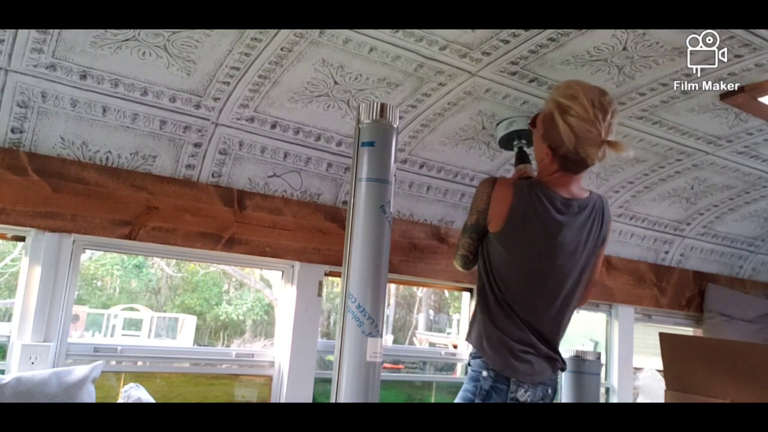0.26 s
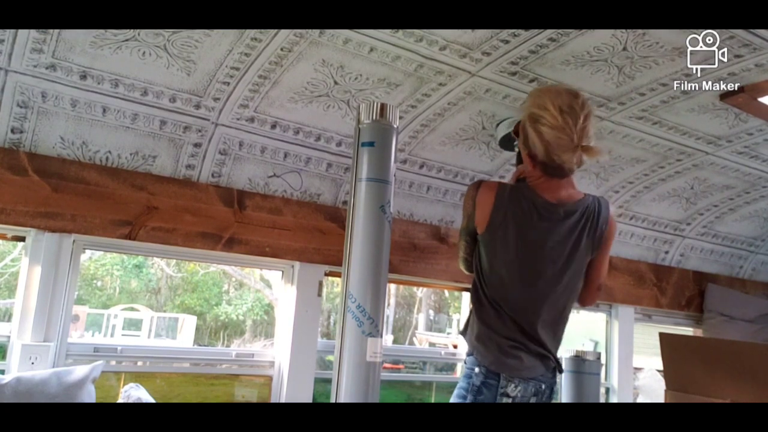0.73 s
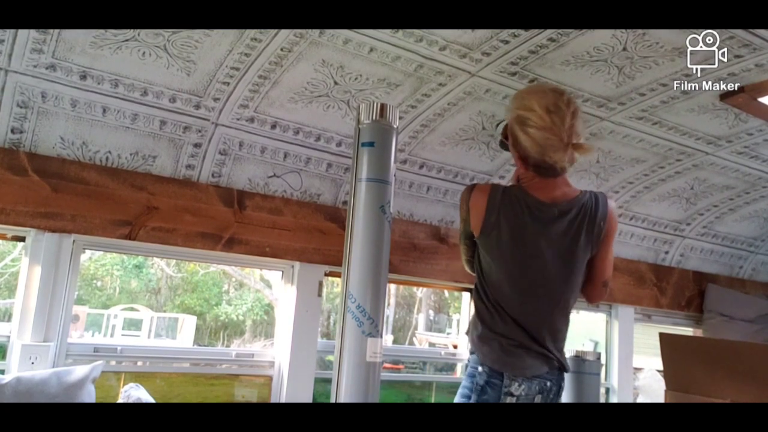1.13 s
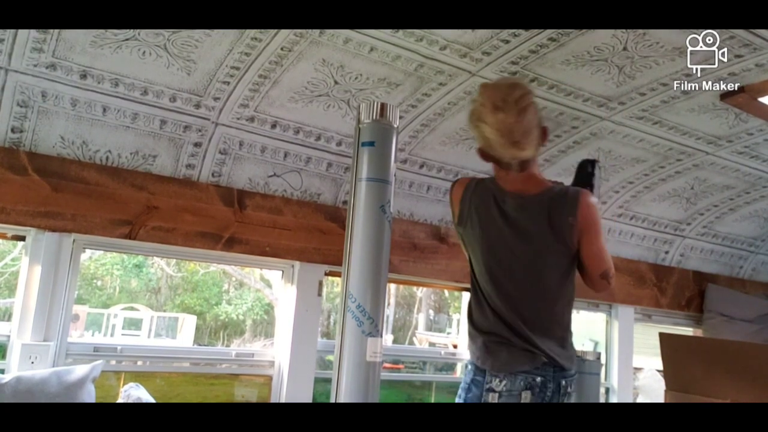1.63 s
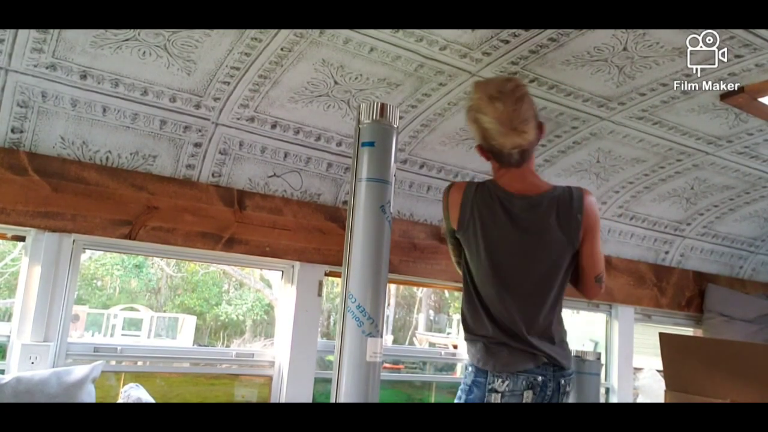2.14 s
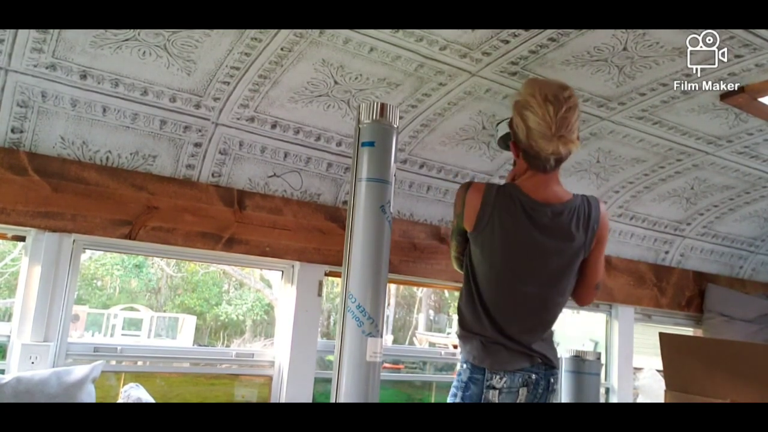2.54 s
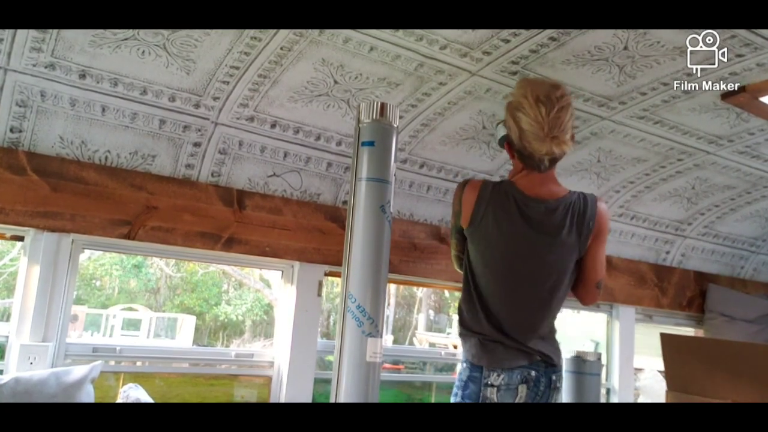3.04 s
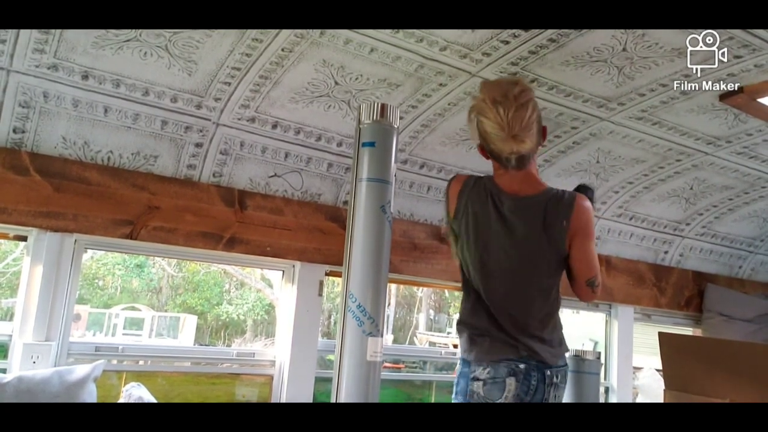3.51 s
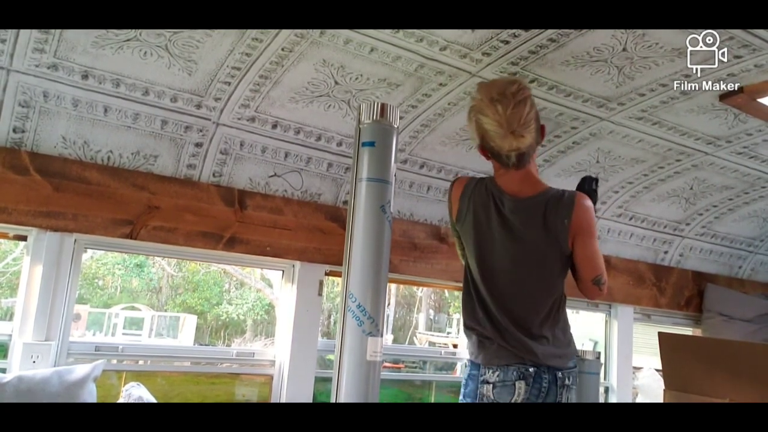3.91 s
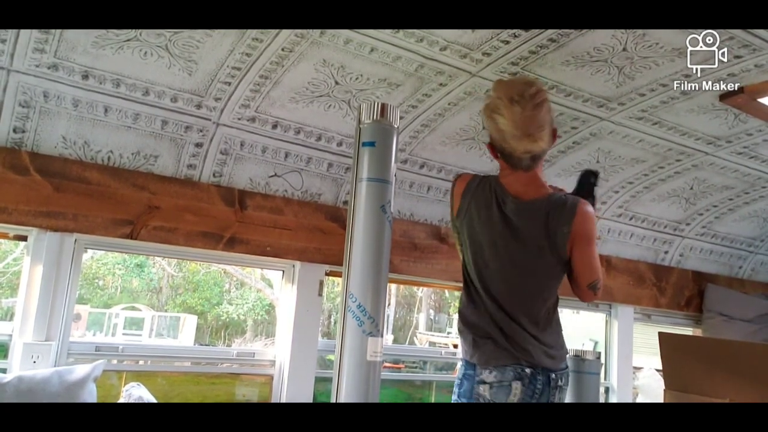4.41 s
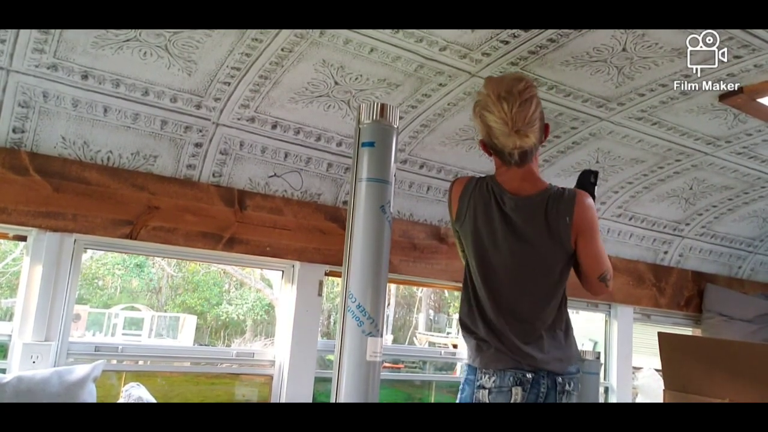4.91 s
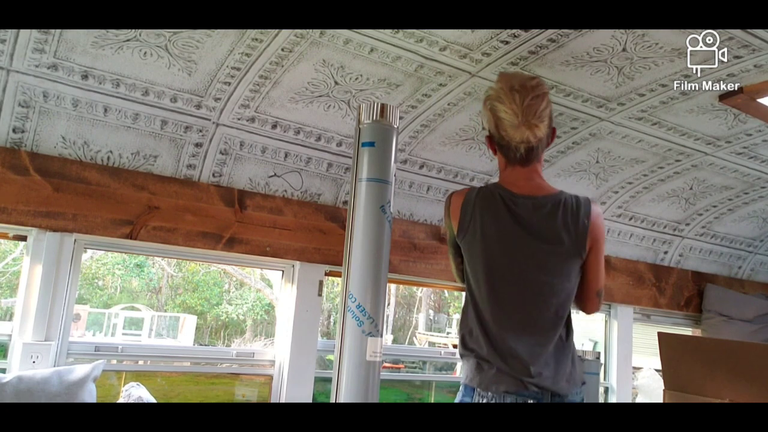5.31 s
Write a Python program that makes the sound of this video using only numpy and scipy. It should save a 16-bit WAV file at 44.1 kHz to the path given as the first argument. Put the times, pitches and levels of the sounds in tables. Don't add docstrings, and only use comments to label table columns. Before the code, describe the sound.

A cordless drill drives a hole saw into sheet metal, grinding and juddering in two loud runs with banging jolts and a brief lull between.

```python
import sys
import numpy as np
from scipy import signal
from scipy.io import wavfile
from scipy.ndimage import uniform_filter1d

SR = 44100
rng = np.random.default_rng(int(sys.argv[2]) if len(sys.argv) > 2 else 0)


def amplitude_ratio(level_db):
    exponent = np.asarray(level_db, float) / 20
    return 10 ** exponent


def to_wav(s):
    ch = np.atleast_2d(s).T
    pcm = np.round(np.clip(ch, -1, 1) * 32767)
    wavfile.write(sys.argv[1], SR, pcm.astype(np.int16))


N = 245146

# (full depth [s], rise [s], hold [s], fall [s], scrape level [dB])
FIRST_RUN_BITES = [(0.0, 0.14, 0.11, .05, -46.5), (0.042, 0.0018, 0.009, .05, -56),
                   (0.057, 0.0078, 0.087, 0.18, -33), (0.265, 0.041, 0.12, 0.15, -26.5),
                   (0.5333, 0.0013, 0.15, 0.16, -29.5), (0.81, 0.0047, 0.089, 0.14, -31.5),
                   (1.068, 0.046, 0.058, 0.15, -31), (1.265, 0.043, 0.026, 0.14, -31),
                   (1.441, 0.11, 0.0033, 0.14, -29), (1.61, .05, 0.011, 0.96, -58),
                   (1.891, 0.12, 0.017, 0.12, -50), (2.028, 0.091, .005, 0.042, -56.5),
                   (2.12, 0.034, 0.044, 0.16, -82), (2.26, .15, .08, .12, -72),
                   (0.526, 0.037, .005, .03, -34)]
# (full depth [s], rise [s], hold [s], fall [s], scrape level [dB])
SECOND_RUN_BITES = [(2.686, 0.0047, .02, 0.18, -63.5), (2.789, 0.0051, 0.039, 0.035, -38.5),
                    (3.172, 0.011, 0.0044, 0.042, -28), (2.841, 0.082, 0.2, 0.071, -33.5),
                    (3.068, .002, 0.069, 0.19, -33), (3.266, 0.034, 0.0029, 0.092, -34.5),
                    (3.393, 0.0038, 0.028, 0.13, -33.5), (3.45, 0.05, 0.0075, 0.12, -29.5),
                    (3.594, 0.034, 0.0091, 0.16, -28), (3.782, 0.035, 0.029, 0.25, -29),
                    (3.925, 0.0062, 0.034, 0.092, -25.5), (4.023, 0.066, 0.071, 0.22, -34.5),
                    (4.245, 0.14, 0.052, 0.096, -32.5), (4.409, 0.13, 0.033, 0.11, -31),
                    (4.554, 0.0063, 0.061, 0.088, -33), (4.735, 0.0049, 0.064, 0.1, -40.5),
                    (4.925, 0.035, 0.046, 0.14, -41.5), (5.131, 0.19, 0.0085, 0.095, -38),
                    (5.24, .02, 0.0077, 0.077, -54.5), (5.305, 0.0032, 0.008, 0.11, -50),
                    (5.36, 0.04, 0.08, .2, -69), (5.454, .003, 0.047, 0.15, -63)]
# (time [s], flex [dB])
ROOF_FLEX = [(0.0, 26), (0.1, 16), (0.3, 12), (0.45, 14), (0.7, 16), (0.92, 9), (1.12, 9), (1.3, 8),
             (1.55, 12.5), (1.72, 9.5), (2.82, 3), (3.05, 12), (3.3, 19), (3.5, 7.5), (3.97, 13.5),
             (4.3, 7.5), (4.7, 13.5), (5.3, 7)]
# (level over the bite [dB], share of flex [dB/dB], steepness of the fall [ratio],
# lag [s], loss per dB of lighter touch [dB/dB])
LAYER_FOLLOW = [
    (-1, 0.98, 0.8, 0.013, 0.5),
    (-1.5, 0.35, 1.12, 0, 0),
    (-2.5, -0.044, 1.78, 0.00071, 0.54),
    (0, 0.05, 1.29, 0.0011, 0.26),
]

# (frequency [Hz], level [dB per Hz])
BOOM_COLOUR = [(35, -29.5), (60, -10), (98, -2), (135, -0.5), (168, -6.5), (194, -5), (221, -11.5),
               (295, -5.5), (333, -10), (367, -12), (436, -20.5), (490, -18.5), (620, -39.5), (1060, -120)]
RASP_COLOUR = [(230, -32), (420, -18), (680, 1.5), (1100, 0.5), (1700, 0.5), (2200, -5), (3000, -11),
               (5000, -27), (12000, -75.5)]
FIZZ_COLOUR = [(5410, -23.5), (9200, -1.5), (10300, -0.5), (11900, 2.5), (14700, 1), (15900, -2.5)]
SCRAPE_COLOUR = [(900, -3), (1700, 1.5), (2500, -5.5), (3300, -4.5), (4200, -3.5), (5700, -6.5),
                 (7500, -13), (9600, -18), (14000, -36)]
# (frequency [Hz], width [Hz], level over the layer [dB])
SHEET_MODES = [(587, 18, -15.5), (670, 30, -9.5), (872, 25, -13), (1030, 49, -24), (1440, 26, -32.5),
               (2100, 60, -14)]
# (frequency [Hz], width [Hz], level over the layer [dB])
CUP_MODES = [(3020, 160, -39.5), (3520, 70, -30), (4260, 68, -23.5), (6360, 130, -27.5), (7070, 140, -22)]

# (time [s], panel level [dB], sheet level [dB], t60 [s])
TOOL_BUMPS = [(0.819, -18, -13, 0.053), (1.62, -82, -58, 2.8), (3.935, -40, -24, 0.17),
              (1.892, -21.5, -41.5, 0.2), (2.03, -43, -75, 0.17), (2.119, -54, -69, 0.24),
              (2.201, -47.5, -73, .6), (2.295, -34.5, -51.5, 0.31), (2.322, -39, -83, 0.2),
              (2.421, -39.5, -74.5, 0.27), (2.675, -41, -53.5, 0.73), (3.081, -21, -14.5, 0.18),
              (3.386, -10, -18, 0.038), (3.6, -44, -28.5, 0.29), (3.95, -41, -18.5, 0.13),
              (4.558, -38, -24, 0.12), (0.538, -33.5, -24, .15), (0.28, -37.5, -29.5, 0.29),
              (5.258, -43, -47, 0.26), (5.305, -38, -72, 0.23)]
# (time [s], level [dB], t60 [s])
SWARF_TRICKLES = [(0.049, -24.5, 0.04), (1.7, -69, 0.42), (2.065, -77, 0.09), (2.121, -69, 0.2),
                  (2.16, -75, 0.61), (2.705, -65.5, 0.4), (5.258, -61, .08), (5.444, -59, 0.027),
                  (5.47, -54, 0.15), (5.5, -70, 0.17)]
# (time [s], level [dB], t60 [s])
CUP_SCUFFS = [(1.62, -60, 0.73), (1.72, -60, 1.1), (1.79, -62, 0.62), (1.855, -46, 0.39), (1.95, -67, 0.18),
              (2.031, -50.5, 0.12), (2.125, -61, 0.11), (2.17, -74.5, .5), (5.459, -72, 0.26)]

# (time [s], blow level [dB])
TOOTH_JAMS = [(0.0598, -36.5), (0.5383, -1), (0.819, 3.5), (0.826, -7.5), (0.84, -9), (1.8944, -39),
              (2.0337, -62), (2.0647, -47), (2.1234, -44), (2.783, -46), (3.084, -11), (3.091, -15.5),
              (3.184, -23.5), (3.2691, -8.5), (3.396, -19), (3.7785, -36), (3.928, -9), (3.946, -2),
              (3.95, -13.5), (4.404, -22), (4.561, -39), (4.7385, -30), (5.446, -73)]
# (time [s], level [dB], ring [Hz])
FIRST_RUN_KNOCKS = [(0.057, -8, 87), (0.08, -6, 123), (0.118, -5.5, 280.6), (0.131, -3, 122.3),
                    (0.179, -12.5, 115), (0.01, -33, 377), (0.204, -31, 296), (0.37, -14.5, 325),
                    (0.602, -6, 278), (0.83, -14.5, 390), (0.855, -11.5, 182), (0.876, -9, 209.5),
                    (1.077, -24.5, 315), (1.287, -13, 247), (1.338, -23, 291), (1.497, -14, 249),
                    (0.285, -14.5, 287), (0.32, -10, 342), (0.394, -6.5, 255), (0.538, -9.5, 192.6),
                    (0.557, -6, 236.5), (0.639, -6, 132), (0.683, -3, 298), (0.838, -2.5, 205.2),
                    (1.101, -4.5, 110.6), (1.13, -21, 111), (1.17, -16, 95.6), (0.215, -17, 105),
                    (1.274, -11.5, 107), (1.398, -6, 105), (1.44, -12.5, 286), (1.488, -15, 143.7),
                    (1.531, -15, 107.7), (1.888, -19, 126.5), (1.933, -16.5, 123.3), (2.303, -23.5, 159),
                    (2.323, -30, 213), (2.342, -36.5, 331.5)]
# (time [s], level [dB], ring [Hz])
SECOND_RUN_KNOCKS = [(2.704, -21.5, 110), (2.818, -22, 117), (2.85, -15, 110), (3.002, -20, 150),
                     (3.096, -4, 139.5), (3.18, -15, 92), (3.207, -7, 111), (3.267, -8, 112),
                     (3.298, -5, 130), (3.397, -7.5, 141.6), (3.553, -12.5, 88.4), (3.787, -13, 95),
                     (3.8, -12, 97), (3.922, -30, 260), (3.936, -16, 413), (3.9498, -0.5, 289),
                     (3.966, -9.5, 251), (3.967, -11, 132), (4.015, -12, 122.7), (4.021, -25, 291),
                     (3.102, -11, 281), (3.182, -16.5, 319), (3.272, -26, 276), (3.295, -15.5, 269),
                     (3.405, -22.5, 248), (3.655, -21, 347), (3.827, -27, 223), (4.238, -38, 300),
                     (4.41, -23, 317), (4.62, -19.5, 337), (4.759, -28, 293), (4.969, -33, 317),
                     (4.051, -24, 115), (4.268, -19, 130), (4.414, -7.5, 121), (4.559, -8.5, 136.2),
                     (4.604, -7, 88), (4.735, -12, 90.3), (4.86, -24.5, 337), (4.901, -27.5, 330),
                     (4.944, -22, 253), (5.083, -24, 100), (5.259, -36, 93), (5.326, -26.5, 100)]

# (time [s], level [dB], length [s])
CUP_SQUEALS = [(0.4249, -26, 0.03), (0.909, -25.5, 0.038), (1.125, -19, 0.02), (2.937, -30, 0.044),
               (5.258, -43.5, 0.028)]
# (main mode [Hz], side mode [Hz])
SQUEAL_PAIRS = [(15300, 15100), (14620, 14250), (15300, 15050), (14750, 14450), (12800, 13050)]
# (time [s], length [s], from [Hz], to [Hz], level [dB])
STEEL_WHISTLES = [(2.72, .05, 6300, 6100, -58), (2.9, .15, 2090, 2110, -41), (3.148, .028, 2100, 2100, -38),
                  (3.028, .03, 3000, 2950, -41), (3.085, .07, 3020, 2980, -45),
                  (4.215, .095, 3150, 3400, -46), (4.335, .055, 3350, 3420, -44),
                  (4.4, .02, 2110, 2110, -39), (4.4, .02, 1740, 1740, -39), (4.425, .035, 2060, 2030, -41),
                  (4.465, .055, 2980, 3120, -52), (5.1, .07, 7080, 7120, -57), (5.19, .07, 2120, 2100, -63),
                  (5.36, .06, 2120, 2100, -73), (5.44, .09, 850, 1000, -70), (4.25, .07, 3480, 3560, -40),
                  (4.255, .035, 2080, 2060, -38), (4.445, .025, 3700, 3150, -43),
                  (4.865, .065, 5530, 5720, -58), (4.93, .085, 2110, 2040, -52), (5.0, .1, 6050, 6150, -51),
                  (5.11, .07, 2080, 2080, -52), (5.34, .11, 4620, 4620, -76), (5.455, .06, 4350, 4280, -73),
                  (4.085, .025, 3300, 3280, -39), (3.455, .025, 2110, 2110, -37),
                  (3.475, .02, 1760, 1750, -38), (3.61, .025, 2040, 2060, -37),
                  (3.605, .02, 1170, 1150, -37), (3.99, .03, 2100, 2110, -35)]
# (time [s], pitch [Hz], level [dB])
GEAR_WHINES = [
    [(2.808, 2700, -44), (2.822, 3100, -36), (2.834, 3570, -40), (2.852, 3660, -38), (2.868, 3510, -31),
     (2.895, 3470, -36)],
    [(2.903, 4080, -33), (2.93, 4020, -39), (2.952, 4150, -36), (2.988, 4110, -39), (3.006, 3600, -35),
     (3.02, 3420, -34), (3.035, 3450, -43), (3.085, 3550, -43)],
]

# (frequency [Hz], t60 [s])
CABIN_DECAY = [(60, 0.72), (300, 0.33), (1000, 0.18), (4000, 0.16), (15000, 0.15)]
# (frequency [Hz], likeness [0-1])
CABIN_LIKENESS = [(60, 1), (150, 0.92), (300, 0.79), (650, 0.83), (1400, 0.034), (15000, 0.032)]
# (frequency [Hz], level [dB])
CABIN_COLOUR = [(60, -10.5), (200, -18), (500, 0), (1500, 6), (15000, 8)]
# (frequency [Hz], level [dB per Hz])
AIR_COLOUR = [(15, -32), (25, 12.5), (53, -1.5), (104, -9), (242, -34.5), (271, -32), (553, -56),
              (915, -53.5), (1600, -64), (1900, -48), (2250, -50), (2450, -67), (6000, -67.5), (7800, -100),
              (13200, -120)]
# (frequency [Hz], level [dB])
PORT_LEAN = [(300, 1.26), (700, -1.5), (1500, -1.5), (4400, -4), (8000, -0.5), (13000, -1)]
# (frequency [Hz], level [dB])
PORT_BAND = [(18, -30), (35, -5), (55, 0), (15870, 0), (15990, -60), (22000, -70)]


def saw():
    catches = chips(per_s=160, spread_db=5.0, smooth=0.61, count=2)
    judder = amplitude_ratio(1.93 * evened(resonate(rng.standard_normal(N), 40.0, 34.0)))
    grit = judder * chips(per_s=1500, spread_db=4.0, smooth=0.44, count=3)
    boom = ringing(catches[0], BOOM_COLOUR, [])
    rasp = ringing(grit[0] + 0.088 * catches[1], RASP_COLOUR, SHEET_MODES)
    fizz = ringing(grit[1], FIZZ_COLOUR, [])
    scrape = ringing(grit[2], SCRAPE_COLOUR, CUP_MODES)
    cutting = sum(bites(*rule) * layer for rule, layer in zip(LAYER_FOLLOW, [boom, rasp, fizz, scrape]))
    panel_gain, sheet_gain = bumps()
    bumped = dulled(panel_gain * boom + sheet_gain * rasp, 2190, order=5)
    swarf = trickle(SWARF_TRICKLES) * fizz
    scuffed = dulled(trickle(CUP_SCUFFS) * scrape, 3700, order=2)
    return cutting + swarf + scuffed + bumped


def chips(per_s, spread_db, smooth, count):
    hit = rng.random(N) < per_s / SR
    size = evened(hit * amplitude_ratio(spread_db * np.minimum(rng.exponential(1, N), 4)))
    impacts = size * rng.choice([-1., 1.], (count, N))
    return (1 - smooth) * impacts + smooth * rng.standard_normal((count, N))


def ringing(drive, points, modes):
    broad = evened(colour(drive, points))
    flexing = 1 + 0.0085 * evened(resonate(rng.standard_normal(N), 0., 16.0))
    rung = sum(amplitude_ratio(db) * evened(resonate(broad, hz * flexing, width)) for hz, width, db in modes)
    return evened(broad + rung)


def bites(over_db, share, steep, lag_s, lost):
    sag_db_per_s = 13
    grab_db, grab_s, sudden_s = 3.5, 0.052, .006
    usual_bite_db = -35
    t = np.arange(0, N, 32) / SR
    s, rise, hold, fall, db = np.transpose(FIRST_RUN_BITES + SECOND_RUN_BITES)[:, :, None]
    u = t - s - lag_s
    edges_db = -20 * np.maximum(-u, 0) / rise - 20 * steep * np.maximum(u - hold, 0) / fall
    grabbed_db = (rise < sudden_s) * grab_db * np.exp(-abs(u) / grab_s)
    held_db = grabbed_db - sag_db_per_s * np.clip(u, 0, hold)
    touch_db = db + lost * np.minimum(db - usual_bite_db, 0)
    gain = np.linalg.norm(amplitude_ratio(touch_db + held_db + edges_db), axis=0)
    flex_db = share * np.interp(t, *np.transpose(ROOF_FLEX))
    return np.interp(np.arange(N) / SR, t, gain * amplitude_ratio(over_db + flex_db))


def bumps():
    rise_s = 0.0062
    gain, t = np.zeros((2, N)), np.arange(SR // 2) / SR
    for s, panel_db, sheet_db, t60 in TOOL_BUMPS:
        for layer, db in zip(gain, (panel_db, sheet_db)):
            add(layer, s, amplitude_ratio(db - 60 * t / t60) * np.minimum(t / rise_s, 1))
    return gain


def trickle(rows):
    rise_s = 0.0013
    gain, t = np.zeros(N), np.arange(SR // 2) / SR
    for s, db, t60 in rows:
        add(gain, s, amplitude_ratio(db - 60 * t / t60) * np.minimum(t / rise_s, 1))
    return gain


def jams():
    t60 = 0.01
    crack, t = np.zeros(N), np.arange(SR // 5) / SR
    for (s, db), noise in zip(TOOTH_JAMS, rng.standard_normal((len(TOOTH_JAMS), len(t)))):
        add(crack, s, amplitude_ratio(db - 3.0 - 60 * t / t60) * noise)
    return colour(crack, [(200, -1.5), (1000, -4.0), (4000, 1.5), (8000, -7.5), (12000, 2.0), (16000, -7.5)])


def snaps():
    snap_db, t60 = -7.5, 0.0079
    out, t = np.zeros(N), np.arange(SR // 50) / SR
    for (s, db), noise in zip(TOOTH_JAMS, rng.standard_normal((len(TOOTH_JAMS), len(t)))):
        add(out, s, amplitude_ratio(db + snap_db - 60 * t / t60) * noise)
    return colour(out, [(200, -4.5), (1000, 9.5), (4000, -4), (8000, -4), (12000, -1.5), (16000, -8)])


def knocks():
    thud, t = np.zeros(N), np.arange(SR // 5) / SR
    for s, db, hz in FIRST_RUN_KNOCKS + SECOND_RUN_KNOCKS:
        overtone = 0.31 * np.sin(2 * np.pi * 2.5 * hz * t) * amplitude_ratio(-60 * t / 0.17)
        ring = np.sin(2 * np.pi * hz * t) + overtone
        t60 = 0.18 * (150 / hz) ** .4
        onset = np.sin(np.pi / 2 * np.minimum(t * hz / 0.84, 1)) ** 2
        add(thud, s, amplitude_ratio(db - 3.0 - 60 * t / t60) * onset * ring)
    return thud


def squeals():
    out, t = np.zeros(N), np.arange(SR // 5) / SR
    noises = rng.standard_normal((len(CUP_SQUEALS), 2, len(t)))
    for (s, db, length), (hz, side_hz), noise in zip(CUP_SQUEALS, SQUEAL_PAIRS, noises):
        burst = np.minimum(t / .002, 1) * (.35 + amplitude_ratio(-700 * t))
        release = amplitude_ratio(-700 * np.maximum(t - length, 0))
        pair = wavering(hz, noise[0], waver_hz=89.3) + 0.8 * wavering(side_hz, noise[1], waver_hz=119.0)
        add(out, s, amplitude_ratio(db + 2.5) * burst * release * pair)
    return out


def whistles():
    edge_db = -3
    arches = [[(s, a, db + edge_db), (s + d / 2, (a + b) / 2, db), (s + d, b, db + edge_db)]
              for s, d, a, b, db in STEEL_WHISTLES]
    lines = GEAR_WHINES + arches
    out = np.zeros(N)
    for rows, noise in zip(lines, rng.standard_normal((len(lines), SR // 3))):
        s, hz, db = np.transpose(rows)
        t = np.arange(s[0], s[-1], 1 / SR)
        line = wavering(np.interp(t, s, hz), noise[:len(t)], waver_hz=35.)
        add(out, s[0], amplitude_ratio(np.interp(t, s, db) + 7.0) * line * signal.windows.tukey(len(t), .3))
    return out


def wavering(hz, noise, waver_hz):
    tremble = evened(uniform_filter1d(noise, 130))
    flutter = amplitude_ratio(2.5 * evened(uniform_filter1d(noise[::-1], 220)))
    return np.sqrt(2) * flutter * np.sin(2 * np.pi * np.cumsum(hz + waver_hz * tremble) / SR)


def cabin(x, count=7):
    out = np.zeros((2, N))
    turn = 8.0 * count * np.arange(N) / SR
    for k in range(count):
        hz, t, z = signal.stft(rng.standard_normal((2, SR // 4)), SR, nperseg=512)
        same = np.clip(read(CABIN_LIKENESS, hz), 0, 1)[:, None]
        z = np.array([z[0], same * z[0] + np.sqrt(1 - same ** 2) * z[1]])
        decay = amplitude_ratio(-60 * t / read(CABIN_DECAY, hz)[:, None])
        tail = signal.istft(z * decay, SR, nperseg=512)[1]
        tail = tail * np.clip(np.arange(tail.shape[1]) / SR / 0.0027, 0, 1)
        tail = tail / np.linalg.norm(tail[0])
        facing = np.sin(np.pi / 2 * np.minimum((turn - k) % count, 2))
        out = out + signal.oaconvolve((facing * x)[None], tail, axes=1)[:, :N]
    return colour(out, CABIN_COLOUR)


def still_air():
    shell_hz, shell_width_hz, shell_db, rumble_db = 2080, 350, -86, -47.5
    a, b, c, d = rng.standard_normal((4, N))
    shell = []
    for x in (c, d):
        once = resonate(x, shell_hz, shell_width_hz)
        shell.append(evened(resonate(once, shell_hz, shell_width_hz)))
    rumble = evened(colour(np.array([a + 0.065 * b, a - .12 * b]), AIR_COLOUR))
    return amplitude_ratio(rumble_db) * rumble + amplitude_ratio(shell_db) * np.array(shell)


def evened(x):
    return x / np.sqrt(np.mean(x ** 2) + 1e-20)


def read(points, hz):
    f, value = np.transpose(points)
    return np.interp(np.log(hz + 1), np.log(f + 1), value)


def add(mix, s, sound):
    part = mix[round(s * SR):][:len(sound)]
    part += sound[:len(part)]


def colour(x, points):
    if x.ndim > 1:
        return np.array([colour(c, points) for c in x])
    gain_db = np.maximum(read(points, abs(np.fft.fftfreq(8192, 1 / SR))), -100)
    log_gain = gain_db * np.log(10) / 20
    taps = np.fft.ifft(np.exp(np.conj(signal.hilbert(log_gain)))).real[:4096]
    return signal.oaconvolve(x, taps, axes=-1)[..., :N]


def resonate(x, hz, width):
    turn = np.exp(2j * np.pi * np.cumsum(hz * np.ones(len(x))) / SR)
    r = np.exp(-np.pi * width / SR)
    return 2 * (turn * signal.lfilter([1 - r], [1, -r], x / turn)).real


def dulled(x, hz, order):
    return signal.sosfilt(signal.butter(order, hz, fs=SR, output="sos"), x)


def later(x):
    lead = 18
    return np.pad(x, (lead, 0))[:N]


def scene():
    cut = saw() + jams() + knocks()
    whistle = squeals() + whistles()
    tool = cut + snaps() + whistle * amplitude_ratio(-2 / 2)
    bass = signal.lfilter(*signal.butter(1, 110., fs=SR), tool)
    direct = np.array([tool, bass + later(tool - bass)])
    room = cabin(cut + .24 * whistle)
    to_the_right = amplitude_ratio(-18.0) * np.array([-whistle, later(whistle)])
    return amplitude_ratio(-6.5) * (direct + room) + still_air() + to_the_right


def roll_off(x):
    return signal.sosfilt(signal.butter(12, 16640, fs=SR, output="sos"), x)


def record(dry):
    ports = [colour(c, [(hz, side * db / 2) for hz, db in PORT_LEAN]) for c, side in zip(dry, (1, -1))]
    limited = .95 * np.tanh(np.array(ports) / .95)
    hiss = amplitude_ratio(-95) * rng.standard_normal(dry.shape)
    return roll_off(colour(limited + hiss, PORT_BAND))


dry = scene()
out = record(dry)
to_wav(out)
```